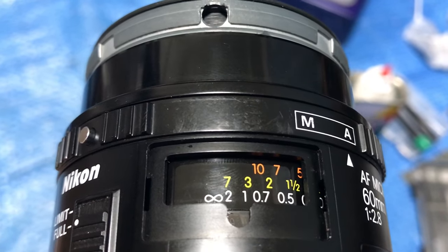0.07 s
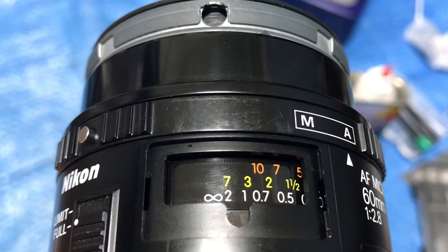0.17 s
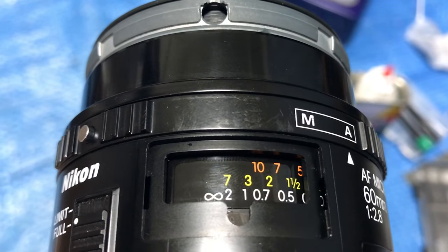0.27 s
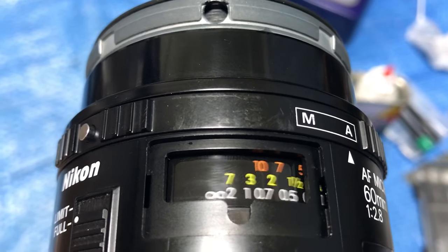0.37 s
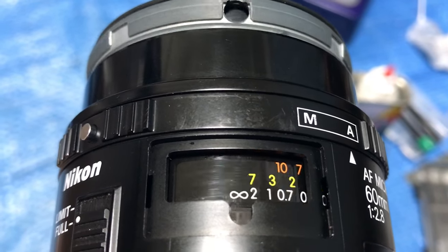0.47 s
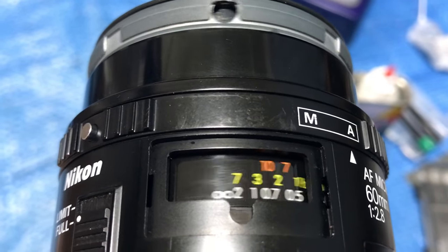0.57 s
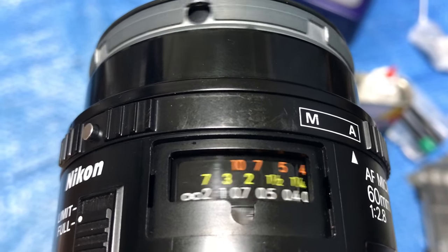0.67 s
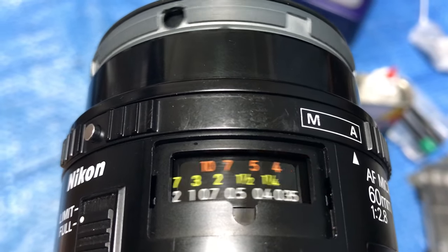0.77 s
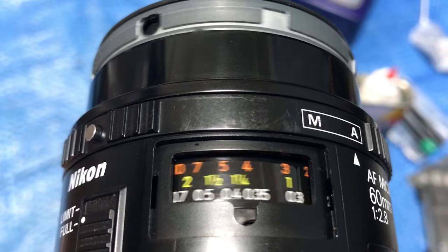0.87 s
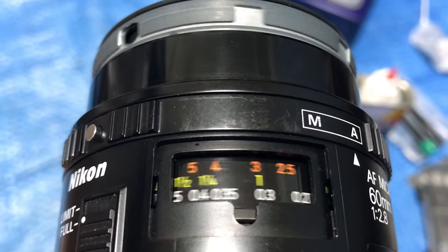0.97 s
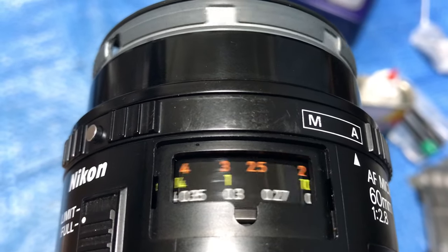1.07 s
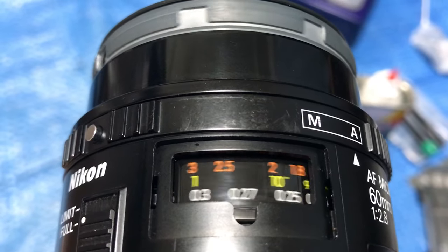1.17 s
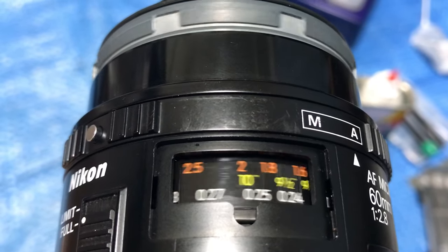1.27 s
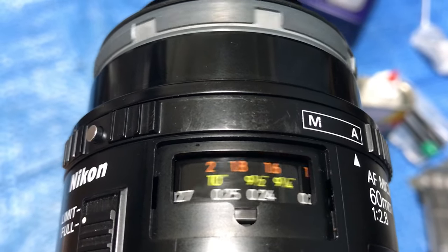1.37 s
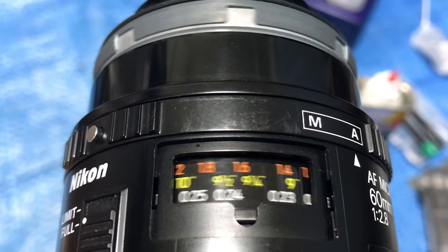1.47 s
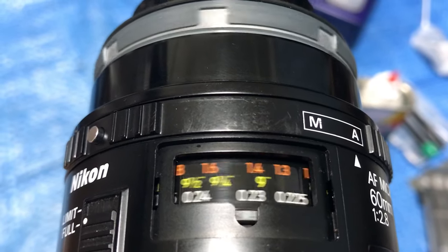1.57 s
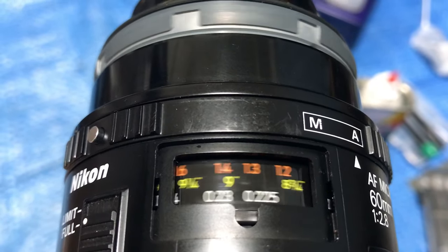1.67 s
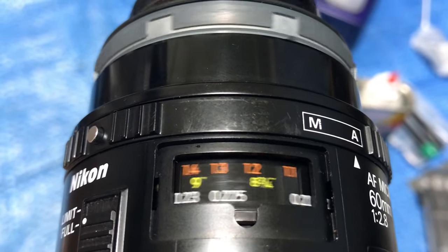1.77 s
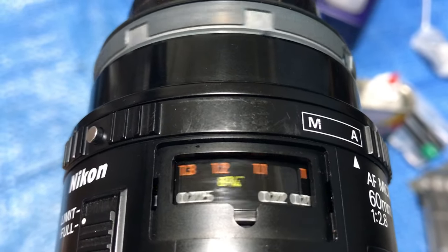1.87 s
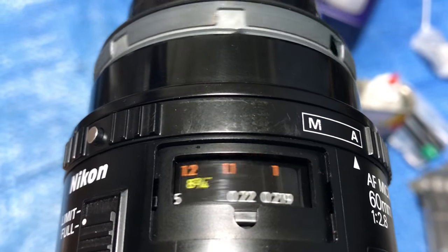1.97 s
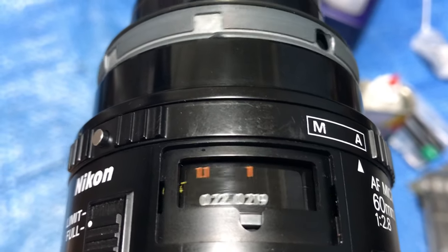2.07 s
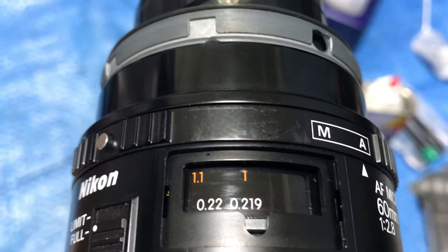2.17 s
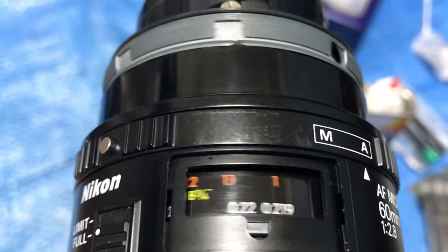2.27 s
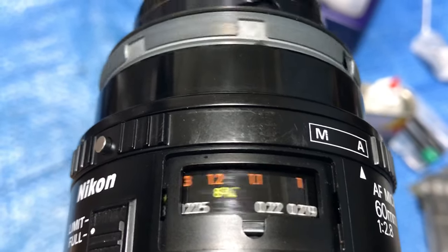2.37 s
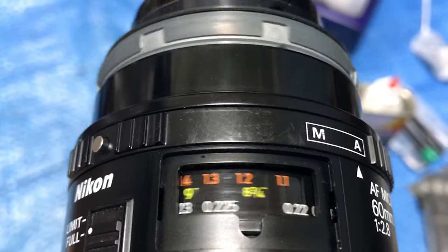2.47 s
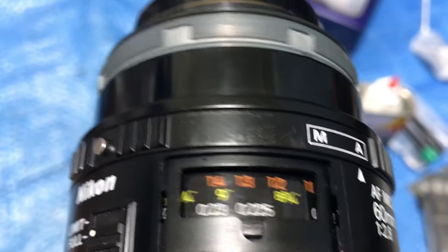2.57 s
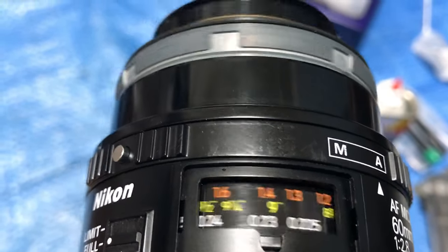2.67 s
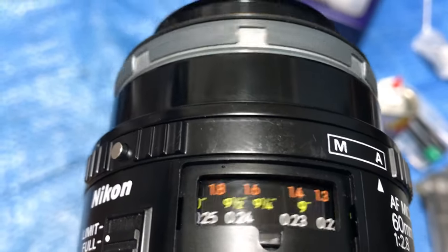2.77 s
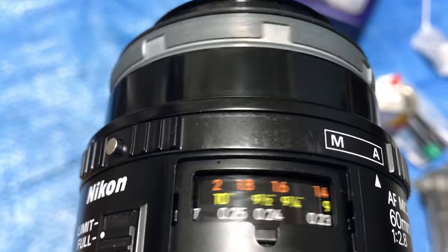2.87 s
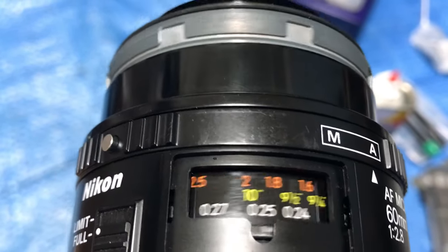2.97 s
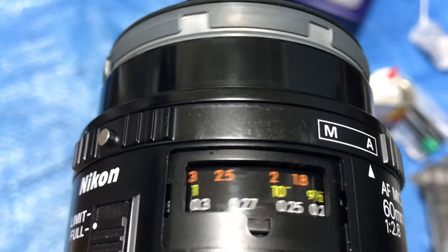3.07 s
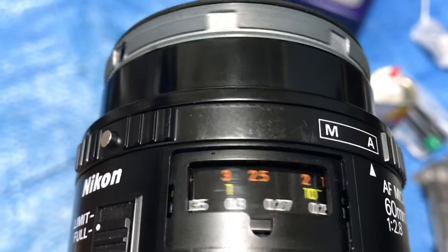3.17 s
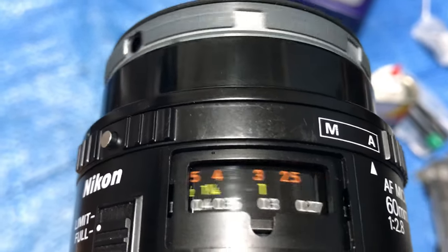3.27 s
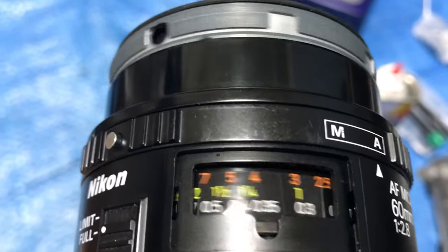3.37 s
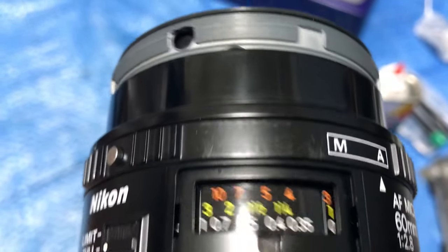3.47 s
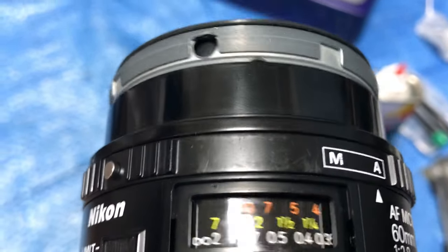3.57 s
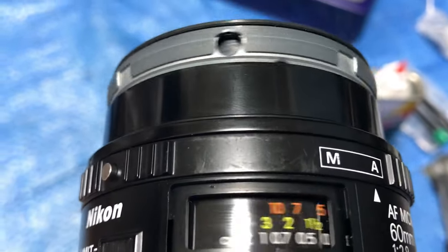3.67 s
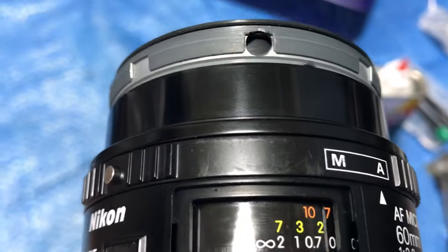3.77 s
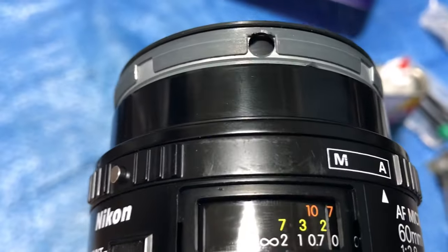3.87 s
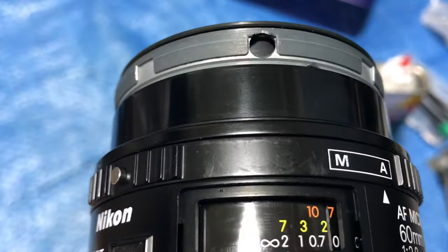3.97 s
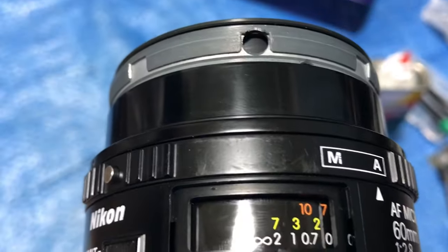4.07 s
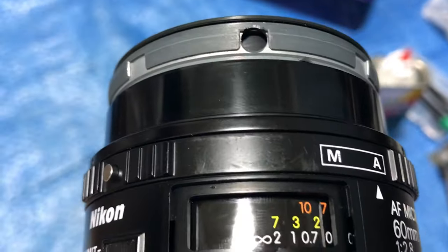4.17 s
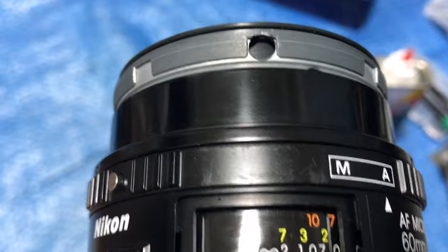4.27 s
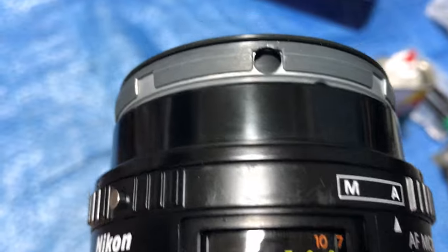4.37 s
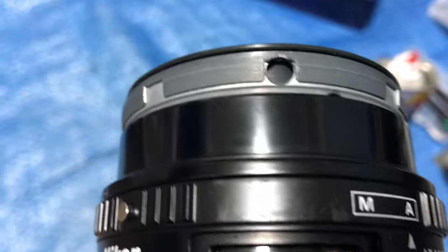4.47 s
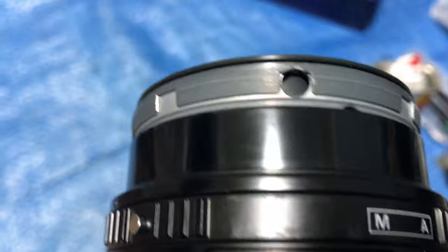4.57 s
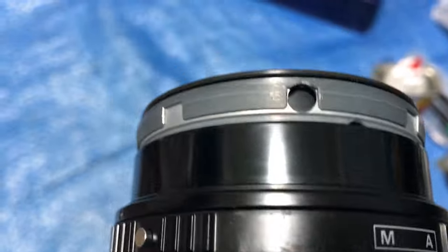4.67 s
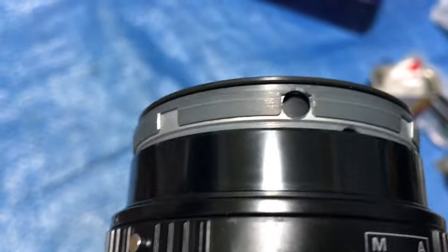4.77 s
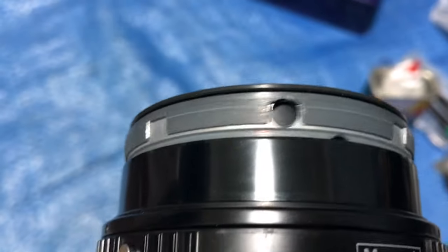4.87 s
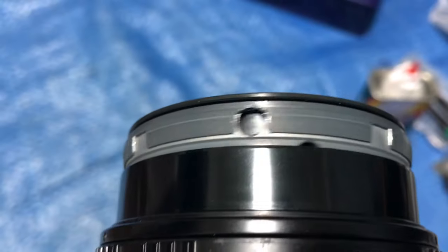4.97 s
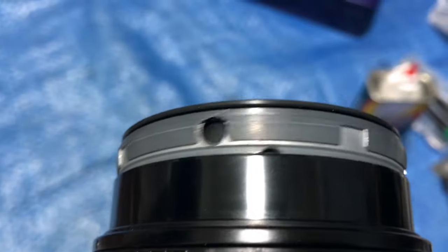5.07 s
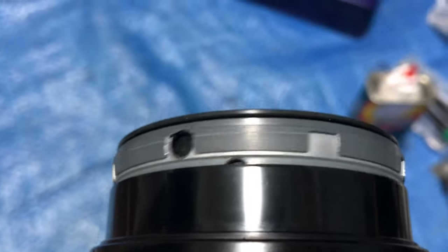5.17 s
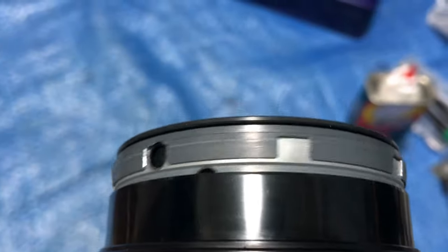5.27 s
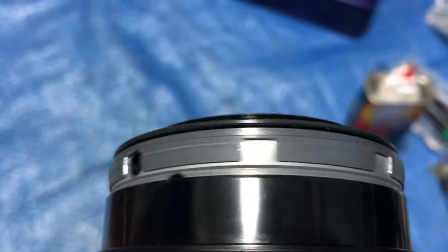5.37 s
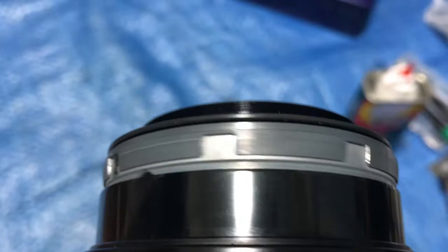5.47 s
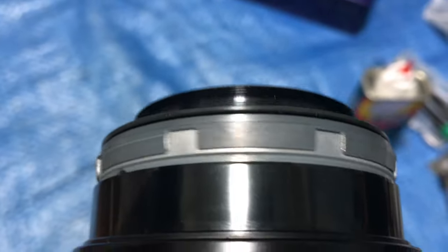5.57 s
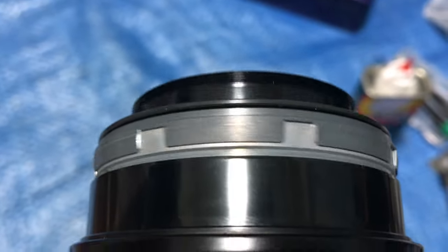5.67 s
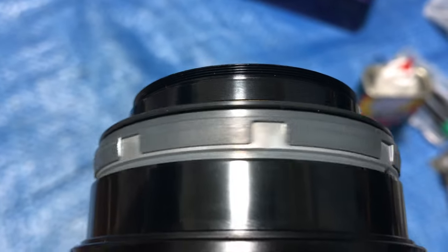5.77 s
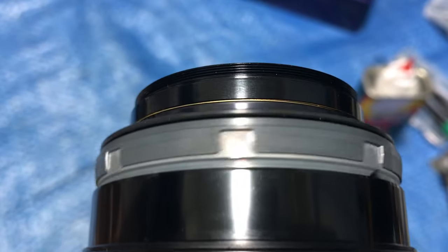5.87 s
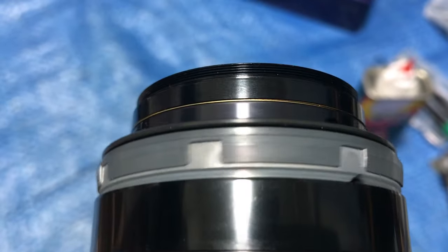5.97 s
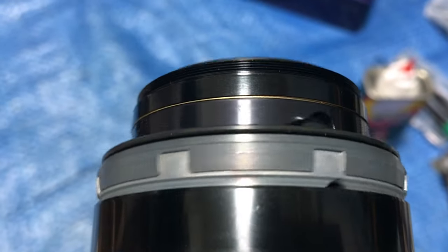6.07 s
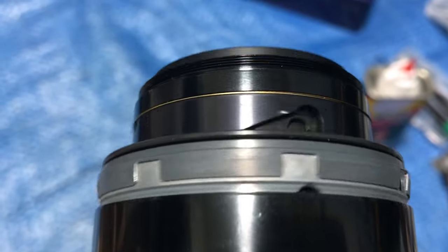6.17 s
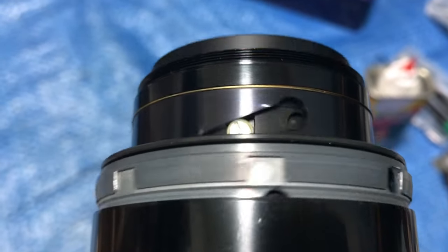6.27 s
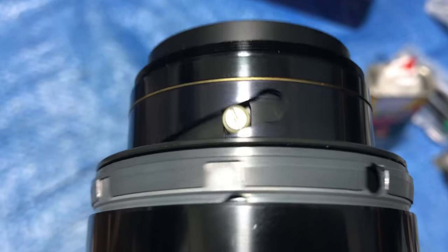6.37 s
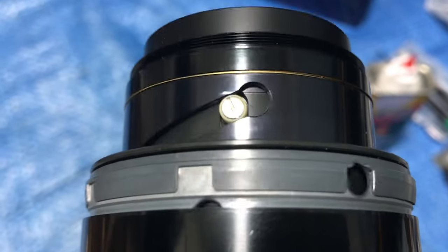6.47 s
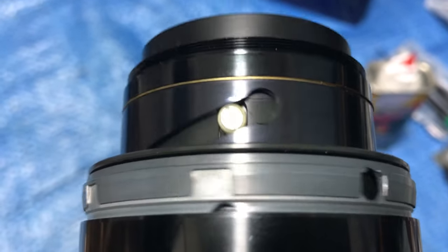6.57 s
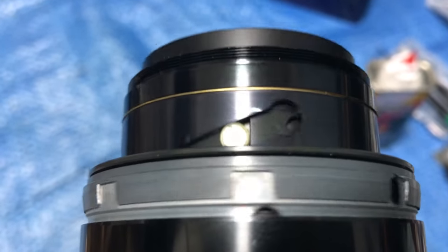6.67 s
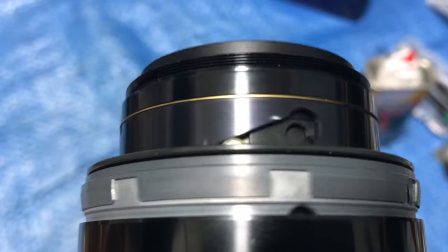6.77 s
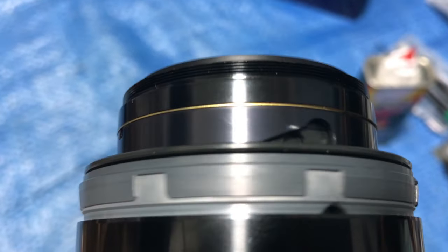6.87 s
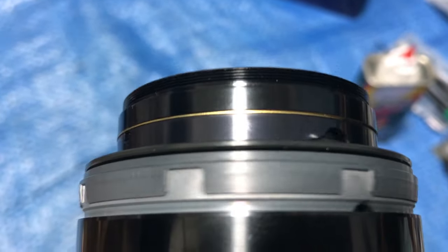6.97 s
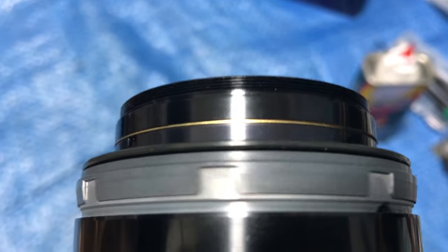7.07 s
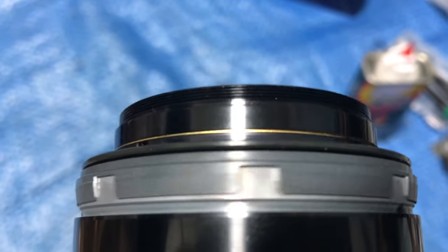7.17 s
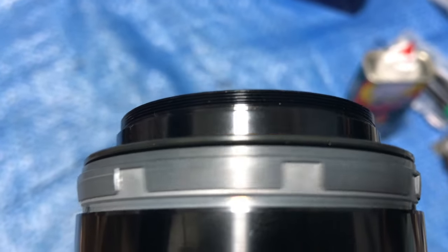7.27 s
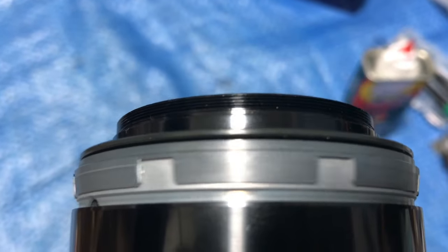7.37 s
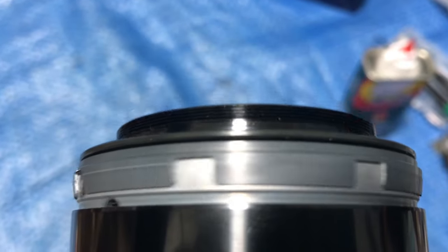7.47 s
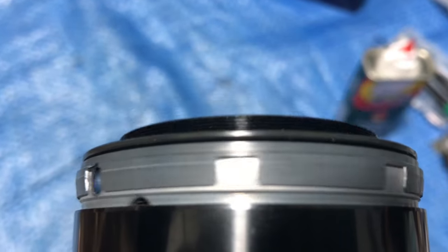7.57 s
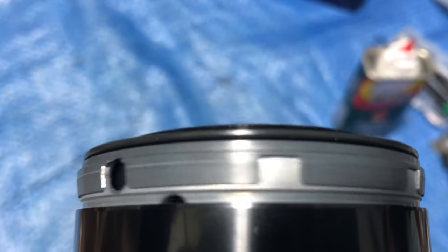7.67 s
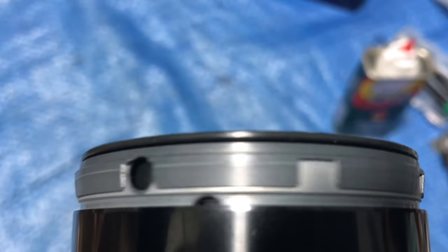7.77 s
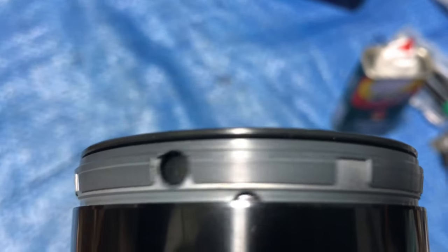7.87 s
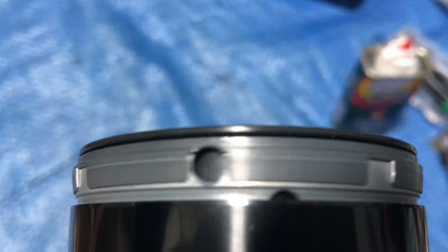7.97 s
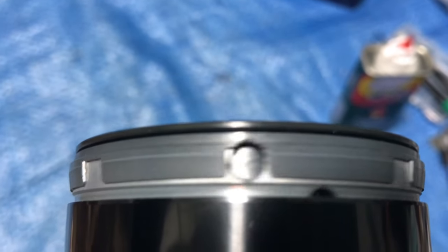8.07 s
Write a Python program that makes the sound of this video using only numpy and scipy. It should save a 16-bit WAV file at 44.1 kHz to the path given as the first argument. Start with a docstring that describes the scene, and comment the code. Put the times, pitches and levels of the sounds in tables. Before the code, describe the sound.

Faint outdoor air and soft low rumble open alone. At 0.44 s a tick, then from 0.47 to 0.55 s a tiny motor burst ends in a hard clack. At 0.62 s the focus motor starts almost instantly, a steady raspy whirr with a buzzing tonal whine, gear grind and bright hiss, its resonances shifting as the barrel slides. It stops at 2.21 s with a sharp double clack, a thin brief whine and rustle. A similar return run lasts 2.28 to 3.87 s, ending in another clack, small ticks and a faint sinking whirr until 4.25 s. Quiet follows. Light knocks at 4.86 to 4.97 s introduce a third run, 4.95 to 6.55 s, with tiny gritty ticks near its end and a rattling clack. The fourth runs from 6.62 to 8.21 s, slightly different in tone, finishing without a closing clack. Everything is close, dry and centered.

```python
"""Camera lens motor outdoors

A focus motor nudges the lens inward, then drives it out and back twice, close to the microphone.
The motor's whine is a set of tones locked to its turning; rough gear teeth add a rasp and a hiss.
Filtered knocks make the hard clack that ends each of the first four runs; noise bursts make gear ticks.
Brief whines and rustles follow some knocks, over shaped noise for the outdoor air and low rumble."""
import sys
import numpy as np
from scipy import signal
from scipy.fft import rfft, irfft
from scipy.io import wavfile

SR = 44100
rng = np.random.default_rng(int(sys.argv[2]) if len(sys.argv) > 2 else 0)


def log_audio(samples):
    """Write samples as a 16-bit WAV file to the path given in sys.argv[1]."""
    # one column per channel
    frames = np.atleast_2d(samples).T
    # limit to full scale, then quantise
    limited = np.clip(frames, -1, 1)
    pcm = np.round(limited * 32767).astype(np.int16)
    wavfile.write(sys.argv[1], SR, pcm)


N = 358091
TIME = np.arange(N) / SR
MOTOR_HZ = 213.07  # motor turns per second at full speed
SPIN_UP_S = .009  # time constant of the motor's start
TRAVEL_S = 1.596  # time from one end stop to the other
SWELL_REACH = 0.56  # share of the travel over which one resonance comes and goes
AIR_DB = -60  # air level before the rumble swells
EDGE_HZ = 15900  # upper limit of the recorder and of the tooth roughness

# Motor runs. Each row: start in seconds, stop in seconds, direction (0 outward, 1 inward),
# grip (row of RINGS), multiple of the motor speed that the barrel sings with.
RUNS = [(.466, .549, 1, 2, 16), (.616, 2.211, 0, 0, 9), (2.275, 3.872, 1, 1, 13), (4.953, 6.551, 0, 2, 16),
        (6.616, 8.21, 1, 3, 20)]
# How hard each run works. Each row: rasp in dB, tooth hiss in dB, gain of the hiss from drawn in to
# run out in dB, pinion whine in dB (all before the trims in run), share of MESH (0-1),
# lift of the singing tone in dB.
LOADS = [(-43, -53.5, -2, -52, 0.98, 3), (-41.5, -53.5, -0.5, -49, 0.94, 13.5),
         (-43, -55.5, -1, -53, 0.7, 9.5), (-42, -51.5, 1.5, -49, .32, 7.5), (-42, -53.8, 0, -50, 1, 12)]
# Speeds of the shafts, in turns per motor turn; the last is the motor itself.
SHAFTS = [.2695, .2895, .3473, 1]
# Pulses per motor turn, from the motor and the meshing gears, that roughen the rasp.
PULSE_RATES = [2.63, 3, 3.473, 3.764, 4, 6]
# Broad spectrum of the gear train. Each row: frequency in Hz, level in dB per Hz.
GEARS = [(150, -14.5), (300, -6.5), (520, -8.5), (750, -4), (1400, -5), (1620, -5.5), (3000, -2), (4400, 1),
         (4950, -4), (6700, -8.5), (7700, -10), (9500, -13), (10400, -18.5), (15500, -20)]
# Barrel resonances, one group for each grip. Each row: frequency in Hz, width in Hz, lift in dB.
RINGS = [
    [(4540, 350, 6), (6380, 1500, 6), (8500, 942, 6.5), (11630, 3200, 10), (13613, 980, 7.5)],
    [(848, 65, 9), (1180, 130, 8.5), (1807, 130, 7.5), (5640, 410, 7.5), (12886, 3600, 6.5)],
    [(824, 68, 4), (1190, 100, 2.5), (3750, 310, 6.5), (6290, 880, 9), (8803, 1300, 3.5), (12750, 2900, 5)],
    [(860, 91, 2.5), (1200, 100, 4.5), (3750, 380, 3), (6550, 840, 10), (9300, 873, 6), (13000, 1800, 7.5)],
]
# Resonances the sliding barrel passes through, a group outward and a group inward.
# Each row: place (0 drawn in, 1 run out), frequency in Hz, width in Hz, lift in dB.
SWELLS = [
    [(.12, 1705, 80, 3), (.17, 6420, 250, -4), (.4, 228, 90, 2), (.49, 4460, 180, 4.5), (.66, 6200, 600, 2),
     (.74, 3835, 150, 2.5), (.85, 790, 130, 7), (.93, 2210, 220, 5.5), (.96, 9000, 800, 5)],
    [(.2, 1705, 80, 4), (.5, 3610, 450, 4.5), (.82, 372, 69.5, 3.5), (1, 3780, 400, 2)],
]
# Friction of the cam track. Each row: place (0-1), change of rasp in dB, change of hiss in dB.
TRACK = [(0, 0.4, -.5), (.24, 0.07, 1.5), (.35, -0.43, -1), (.6, 0.5, 0.5), (.72, -0.36, 0), (1, .4, .8)]
# How firmly the pinion meshes, a group outward and a group inward.
# Each row: place (0-1), level in dB before the run's share is applied.
MESH = [
    [(0, -6), (.14, 1), (.25, -4), (.36, -15), (.6, -5), (.9, -15), (1, -11.5)],
    [(0, -2), (.12, -4.5), (.28, 1), (.5, -6.5), (1, -21)],
]
# Motor tones. Each row: multiple of the motor speed, outward level and inward level in dB
# against the run's body level.
MOTOR_TONES = [(1, -28, -31.5), (3, -25.5, -30.5), (4, -31, -24), (6, -27.5, -26), (7, -19.5, -17.5),
               (8, -24.5, -26.5), (9, -27.5, -18.5), (11, -22.5, -34), (13, -21, -24.5), (14, -18, -21),
               (16, -18.5, -19), (17, -19, -23.5), (18, -17.5, -29.5), (19, -20.5, -24.5), (20, -26, -25),
               (31, -19, -26.5)]
# Multiples of the motor speed at which the slower gears sing.
GEAR_MULTIPLES = [.689, 3.473, 3.764, 5.387, 6.66, 8.68, 10.42, 12.63, 13.9, 17.37, 21.13, 26.05]
# Levels of those gear tones, a row outward and a row inward, in dB against the run's body level
# before the trim in run.
GEAR_TONES = [(-48.5, -29.5, -30, -24.5, -29.5, -22, -22.5, -24, -19, -21, -19, -29.5),
              (-25.5, -23.5, -32, -26.5, -24.5, -23, -35, -17, -33.5, -17.5, -30.5, -25)]
# Blows on the end stops. Each row: time in seconds, level in dB (all its energy averaged over 5 ms),
# rattle in dB against the contact, rattle decay in seconds, stop (row of STOP_RINGS).
BLOWS = [(.5483, -21, -3, .003, 0), (.5535, -39, -5, .002, 0), (2.21, -25.5, -3.5, .003, 1),
         (2.2135, -23, 0, .0016, 1), (3.8714, -21, -7.5, .003, 0), (3.8762, -33.5, 2, .002, 0),
         (6.5505, -25, 12, .003, 2), (6.554, -21.5, 1.5, .002, 2)]
# Spectrum of the far-focus stop. Each row: frequency in Hz, level in dB per Hz.
FAR_STOP = [(150, -25), (350, -15), (700, -38.5), (950, -15.5), (1550, -18.5), (3700, -11), (4700, -1),
            (7200, -22), (11000, -15.5), (15500, -25)]
# Spectrum of the close-focus stop. Each row: frequency in Hz, level in dB per Hz.
NEAR_STOP = [(150, -8), (450, -7), (700, 0.5), (1600, -5), (4200, 4), (6800, -6), (9000, -12),
             (13000, -12.5), (15500, -19)]
# What the barrel rings with: one group drawn in, then two grips run out.
# Each row: frequency in Hz, width in Hz, lift in dB.
STOP_RINGS = [
    [(893, 450, 11.5), (1818, 188, 6), (2260, 318, 11.5), (3300, 260, 10.5), (6450, 390, 10.5),
     (8200, 960, 8.5), (10060, 400, 6.5)],
    [(620, 100, 6.5), (1260, 140, 14.5), (2400, 88, 6.5), (4444, 460, 8), (12625, 320, 5)],
    [(1240, 110, 11.5), (1780, 160, 11), (6800, 880, 11), (9571, 250, 12), (12769, 1051, 2)],
]
# Gears taking up their slack. Each row: time of the knock in seconds, level in dB before its envelope,
# bass in dB, treble in dB, ring of the housing in Hz, lead of the tick in seconds,
# tick in dB before its envelope.
TAKE_UPS = [(0.4769, -32, 6, 3, 410, 0.017, -43), (.634, -31.5, 8.5, 12, 800, 0.02, -34),
            (2.2881, -34.5, 9, 4, 1280, 0.013, -34.5), (3.925, -45, 12, 0, 1100, .012, -47.5),
            (4.8832, -28.5, 1, 8, 1150, .0135, -42), (4.9705, -26.5, 2.5, 10, 500, 0.016, -35),
            (6.632, -31.5, 12, 4, 362, .014, -30)]
# Lone ticks of loose parts and grit. Each row: time in seconds, level in dB before its envelope,
# decay in seconds, treble in dB.
TICKS = [(0.444, -38.5, 0.0027, 9), (1.9367, -32, .0014, 15.5), (2.2687, -35, .0012, -1),
         (3.952, -42, 0.0016, 7), (4.0125, -49, 0.0017, 9), (4.021, -45.5, .0024, 6),
         (4.215, -56, .0018, -8), (4.859, -37.5, 0.003, 8.5), (4.939, -48.5, 0.0065, 1),
         (5.9688, -32, .001, 17), (6.278, -26, 0.0012, 18), (6.6105, -39, .0032, -1)]
# The motor spinning on briefly. Each row: time in seconds, length in seconds,
# whine in dB and rustle in dB, both before their envelopes.
OVERRUNS = [(.556, .042, -63, -44), (2.218, 0.043, -63, -44.5), (3.88, 0.048, -57, -47.5),
            (4.894, 0.049, -60, -49.5), (6.559, 0.056, -58, -45.5)]
# Spectrum of the shuddering barrel. Each row: frequency in Hz, level in dB per Hz.
SHUDDER = [(60, 5.5), (200, 0), (500, -7), (1000, 2), (2000, -3), (5000, -5.5), (15000, -24)]
# Soft whirr as the drive comes to rest. Each row: time in seconds, frequency in Hz, level in dB.
SETTLE = [(3.921, 1400, -57), (4.0, 1313, -67), (4.07, 1165, -66), (4.17, 1135, -64), (4.25, 1055, -75)]
# Spectrum of outdoor air and rumble. Each row: frequency in Hz, level in dB per Hz.
AIR = [(12, -49), (20, -20.5), (36, -16.5), (60, -2), (77, -11.5), (91, -19), (123, -10.5), (163, -21),
       (485, -31.5), (1260, -28.5), (2020, -36.5), (4810, -46), (14700, -52), (16000, -61)]
# Swell of the low rumble around the hand-held microphone. Each row: time in seconds, change in dB.
RUMBLE = [(0, 1), (1.2, -0.5), (2.5, -1.5), (4.2, 1), (4.8, -1.5), (5.3, 2.5), (6.1, 3.5), (7.2, 3),
          (8.1, 1)]


def run(start, stop, direction, grip, singing, load, bite_s=0.013,
        rasp_db=-1.94, hiss_db=0, motor_db=0, gear_db=-1, pinion_db=2.5):
    """The motor spins up to its governed speed; the load follows the lens along its travel."""
    body_db, teeth_db, teeth_gain_db, whine_db, mesh_share, lift_db = load
    t = np.arange(start, stop, 1 / SR)
    speed = 1 - np.exp(-(t - start) / SPIN_UP_S)
    unsteadiness = 1 + .0007 * drift(len(t), 15)
    turns = np.cumsum(MOTOR_HZ * speed * unsteadiness) / SR

    to_go = (stop - t) / TRAVEL_S
    place = to_go if direction else 1 - to_go  # 0 drawn in, 1 run out
    track_place, rough_db, scrape_db = np.transpose(TRACK)
    body = amp(body_db + np.interp(place, track_place, rough_db))
    hiss = amp(teeth_db + teeth_gain_db * (place - 1.0) + np.interp(place, track_place, scrape_db))
    whine = amp(whine_db + mesh_share * np.interp(place, *np.transpose(MESH[direction])))

    rub = colour(rasp(turns), shape(GEARS, RINGS[grip]))
    rub = patches(swells(rub, place, direction))
    # split the rub into a rasp below 7500 Hz and a hiss above
    low = signal.sosfiltfilt(signal.butter(8, 7500, fs=SR, output="sos"), rub)
    high = rub - low

    motor = 0
    for multiple, *db in MOTOR_TONES:
        lift = lift_db * (round(multiple) == singing)
        motor = motor + amp(db[direction] + lift) * tone(turns, round(multiple))
    gears = 0
    # the slower gears have more play, so their tones are less steady
    for multiple, db in zip(GEAR_MULTIPLES, GEAR_TONES[direction]):
        gears = gears + amp(db) * tone(turns, multiple, waver=0.505, waver_hz=9.8)
    tones = swells(amp(motor_db) * motor + amp(gear_db) * gears, place, direction)

    sound = body * (amp(rasp_db) * unit(low) + tones)
    sound += amp(hiss_db) * hiss * unit(high)
    sound += amp(pinion_db) * whine * pinion(turns, direction)
    engaged = (1 - np.exp(-(t - start) / bite_s)) ** 2  # the load builds as the slack closes
    return sound * engaged


def tone(turns, multiple, waver=0.16, waver_hz=9):
    """One pitch locked to the motor's turning, wavering in strength with the load."""
    load = 1 + waver * drift(len(turns), waver_hz)
    return np.sqrt(2) * load * np.cos(2 * np.pi * (multiple * turns + rng.random()))


def pinion(turns, direction, swing=.5, throb=0.19, octave_db=(-4, -19), waver=0.11, jitter=0.14,
           teeth_count=15):
    """The motor's small gear meshes once a tooth; an off-centre wheel swings its pitch and strength."""
    wheel = 2 * np.pi * turns * .193
    mesh = 2 * np.pi * teeth_count * turns
    mesh = mesh + swing * np.sin(wheel) + jitter * drift(len(turns), 120)
    force = 1 + throb * np.sin(wheel) + waver * drift(len(turns), 25)
    octave = amp(octave_db[direction]) * np.cos(2 * mesh)
    return np.sqrt(2) * force * (np.cos(mesh) + octave)


def rasp(turns, sliding=1.4, wheels=0.52, flutter=0.1, second=.09, wobble=0.1, roughen=.075):
    """Wheels repeat their roughness over fresh sliding noise; the force pulses with motor and gears."""
    repeating = sum(teeth(turns * ratio, MOTOR_HZ * ratio) for ratio in SHAFTS[:-1])
    angle = 2 * np.pi * turns
    force = 1 + flutter * np.cos(angle) + second * np.cos(2 * angle)
    force += wobble * np.cos(angle * SHAFTS[1])
    for rate in PULSE_RATES:
        force += roughen * np.cos(angle * rate + 2 * np.pi * rng.random())
    return force * (wheels * repeating + sliding * rng.standard_normal(len(turns)))


def teeth(turns, shaft_hz, size=32768):
    """The roughness of one wheel, met again on every turn."""
    bumps = rng.standard_normal((int(EDGE_HZ / shaft_hz), 2)) @ [1, 1j]
    surface = irfft(bumps, size)
    return unit(np.interp(turns % 1 * size, np.arange(size), surface))


def swells(x, place, direction):
    """Lifts or dips one resonance after another as the barrel slides past."""
    out = x
    for middle, hz, width, db in SWELLS[direction]:
        near = np.cos(np.pi * np.clip((place - middle) / SWELL_REACH, -.5, .5)) ** 2
        band = signal.lfilter(*signal.iirpeak(hz, hz / width, fs=SR), x)
        out = out + (amp(db * near) - 1) * band
    return out


def patches(x, depth_db=1.28, rate_hz=7, sharpness=7, count=8):
    """The contact points wander, so the barrel's upper resonances are driven unevenly."""
    out = x
    for hz in np.geomspace(2800, 14000, count):
        band = signal.lfilter(*signal.iirpeak(hz, sharpness, fs=SR), x)
        out = out + (amp(depth_db * drift(len(x), rate_hz)) - 1) * band
    return out


def blow(db, rattle_db, decay, stop, spread_s=0.001228, size=4096):
    """A hard contact, then a short rattle of loose parts, both ringing in the barrel."""
    t, hz = np.arange(size) / SR, np.fft.rfftfreq(size, 1 / SR)
    delay = spread_s * np.sqrt(2000 / (hz + 500))  # bending waves carry the treble fastest
    contact = irfft(np.exp(-2j * np.pi * np.cumsum(delay) * hz[1]))
    rattle = rng.standard_normal(size) * np.exp(-t / decay) * (1 - np.exp(-t / spread_s))
    force = contact + amp(rattle_db) * rattle / np.linalg.norm(rattle)
    clack = colour(force, shape(NEAR_STOP if stop else FAR_STOP, STOP_RINGS[stop]))
    return amp(db) * clack / np.linalg.norm(clack) * np.sqrt(.005 * SR)


def take_up(s, db, bass_db, treble_db, ring_hz, lead, tick_db, rebound_s=.0058, rebound_db=0,
            dull_db=-14, ring_db=7, sharpness=4):
    """A tick as the coupling catches, a knock as the gears close, a duller rebound; the last two ring."""
    tick = click(tick_db, decay=0.0038, bass_db=6, treble_db=9.5)
    knock = click(db, decay=.0048, bass_db=bass_db, treble_db=treble_db)
    rebound = click(db + rebound_db, decay=0.0047, bass_db=bass_db, treble_db=treble_db + dull_db)
    ring = signal.iirpeak(ring_hz, sharpness, fs=SR)
    sounds = [(s - lead, tick)]
    for at, hit in ((s, knock), (s + rebound_s, rebound)):
        sounds.append((at, hit + (amp(ring_db) - 1) * signal.lfilter(*ring, hit)))
    return sounds


def click(db, decay, bass_db, treble_db, rise_s=0.00082, linger=0.087, linger_s=0.015, size=4096):
    """Teeth chatter into contact and rub on briefly, with more bass or treble as asked."""
    t = np.arange(size) / SR
    gears = shape(GEARS)
    tilt = shape([(900, bass_db), (2200, 0.0015), (4800, 0), (10000, treble_db)])
    chatter = unit(colour(rng.standard_normal(size), lambda hz: gears(hz) + tilt(hz)))
    fade = np.exp(-t / decay) + linger * np.exp(-t / linger_s)
    return amp(db) * chatter * fade * (1 - np.exp(-t / rise_s))


def overrun(length, whine_db, rustle_db, from_hz=6150, to_hz=6600, octave_db=-13, decay_s=0.039):
    """The motor spins on: a thin rising whine over the dying rustle of the shaken barrel."""
    t = np.arange(0, 2 * length, 1 / SR)
    angle = 2 * np.pi * np.cumsum(from_hz + (to_hz - from_hz) * t / length) / SR
    swell = np.sin(np.pi * np.minimum(t / length, 1))  # the whine is gone after one length
    whine = (np.sin(angle) + amp(octave_db) * np.sin(2 * angle)) * swell
    rustle = unit(colour(rng.standard_normal(len(t)), shape(SHUDDER))) * np.exp(-t / decay_s)
    return np.sqrt(2) * amp(whine_db) * whine + amp(rustle_db) * rustle


def settle(width_hz=260, rub_db=-58, rub_decay_s=0.043):
    """The gears rub faintly as they coast, under noise in one sinking resonance."""
    s, hz, db = np.transpose(SETTLE)
    t = np.arange(s[0], s[-1], 1 / SR)
    angle = 2 * np.pi * np.cumsum(np.interp(t, s, hz)) / SR
    # two slow random signals on one pitch make a narrow band of noise
    whirr = drift(len(t), width_hz) * np.cos(angle) + drift(len(t), width_hz) * np.sin(angle)
    rub = unit(colour(rng.standard_normal(len(t)), shape(GEARS))) * np.exp(-(t - s[0]) / rub_decay_s)
    return s[0], amp(np.interp(t, s, db)) * unit(whirr) + amp(rub_db) * rub


def air(swell_db=-0.5, rumble_hz=150):
    """Shaped noise: a swelling low rumble and a faint far-off wash."""
    gain = amp(shape(AIR)(np.fft.rfftfreq(N, 1 / SR)))
    noise = unit(irfft(rfft(rng.standard_normal(N)) * gain, N))
    rumble = signal.sosfiltfilt(signal.butter(2, rumble_hz, fs=SR, output="sos"), noise)
    wash = noise - rumble
    swell = amp(np.interp(TIME, *np.transpose(RUMBLE)) + swell_db * drift(N, 4))
    return amp(AIR_DB) * (wash + swell * rumble)


def amp(db):
    """Turns decibels into gain."""
    return 10 ** (np.asarray(db) / 20)


def unit(x):
    """Scales a sound to an average (rms) level of 1."""
    return x / np.sqrt(np.mean(x ** 2) + 1e-20)


def drift(n, rate_hz):
    """Smooth random wandering, two seconds long at rms 1, repeated or cut to n samples."""
    hz = np.fft.rfftfreq(2 * SR, 1 / SR)
    slow = irfft(rfft(rng.standard_normal(2 * SR)) * np.exp(-(hz / rate_hz) ** 2))
    return np.resize(unit(slow), n)


def shape(points, rings=()):
    """Gives gain in dB against frequency: a broad spectrum with resonances on top."""
    f, db = np.transpose(points)

    def gain_db(hz):
        broad = np.interp(np.log(hz + 1), np.log(f + 1), db)
        return broad + sum(d / (1 + (2 * (hz - c) / w) ** 2) for c, w, d in rings)
    return gain_db


def colour(x, spectrum, size=4096):
    """Filters with the given spectrum, never ahead of time, so that a blow rings after it lands."""
    log_gain = np.log(amp(spectrum(abs(np.fft.fftfreq(size, 1 / SR)))))
    response = np.fft.ifft(np.exp(np.conj(signal.hilbert(log_gain)))).real[:size // 2]
    return signal.fftconvolve(x, response)[:len(x)]


def add(mix, s, sound):
    """Mixes a sound in at time s in seconds."""
    part = mix[round(s * SR):][:len(sound)]
    part += sound[:len(part)]


def scene():
    """Everything reaches one microphone, alike in both channels."""
    mix = air()
    for row, load in zip(RUNS, LOADS):
        add(mix, row[0], run(*row, load))
    for s, *row in BLOWS:
        add(mix, s, blow(*row))
    for s, *row in OVERRUNS:
        add(mix, s, overrun(*row))
    for row in TAKE_UPS:
        for s, sound in take_up(*row):
            add(mix, s, sound)
    for s, db, decay, treble_db in TICKS:
        add(mix, s, click(db, decay, bass_db=0.5, treble_db=treble_db))
    add(mix, *settle())
    return np.array([mix, mix])


def record(dry):
    """The recorder passes only what lies below its upper limit."""
    low_pass = signal.firwin(511, EDGE_HZ, window=("kaiser", 9), fs=SR)
    return signal.oaconvolve(dry, low_pass[None], "same")


dry = scene()
out = record(dry)
log_audio(out)
```